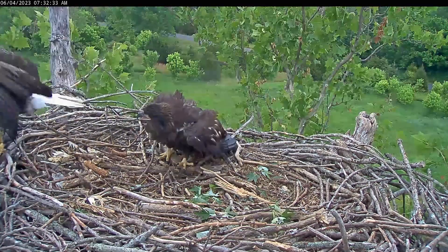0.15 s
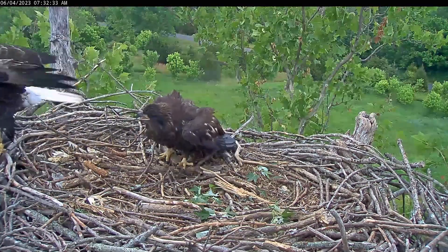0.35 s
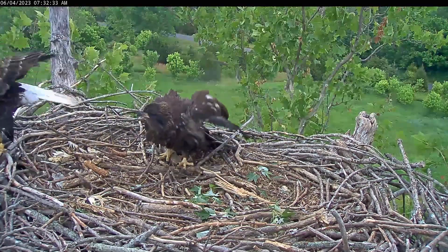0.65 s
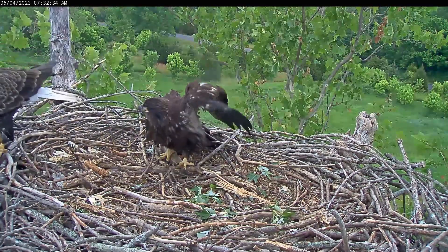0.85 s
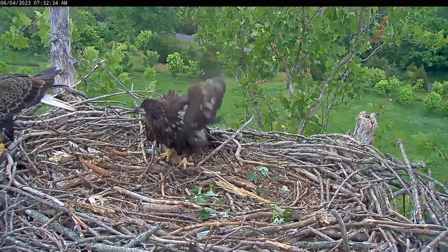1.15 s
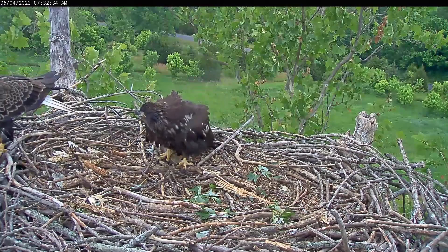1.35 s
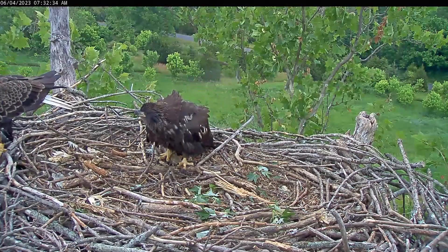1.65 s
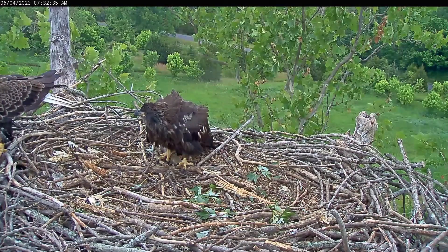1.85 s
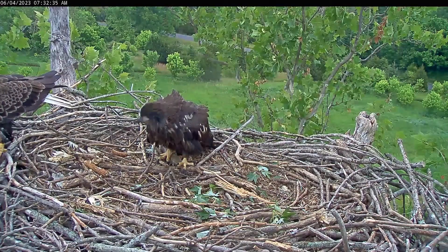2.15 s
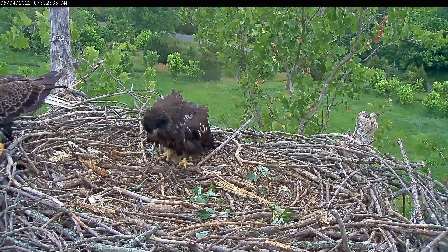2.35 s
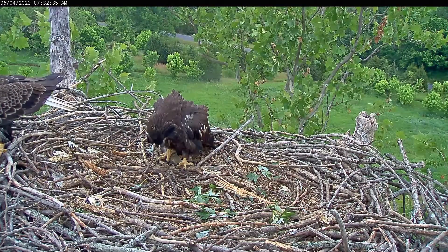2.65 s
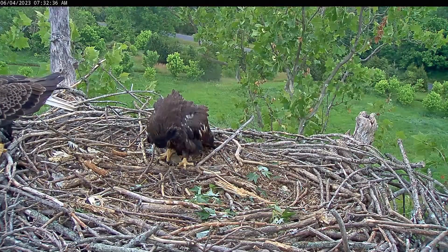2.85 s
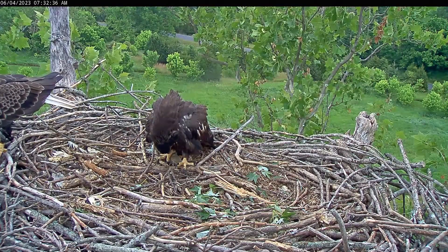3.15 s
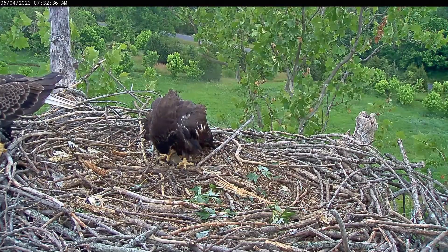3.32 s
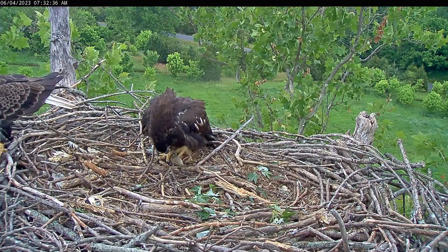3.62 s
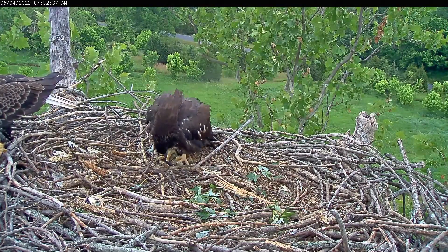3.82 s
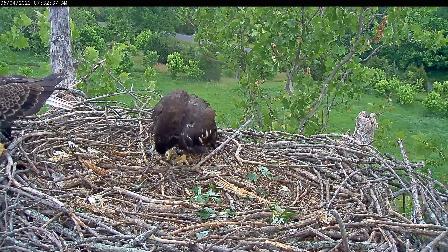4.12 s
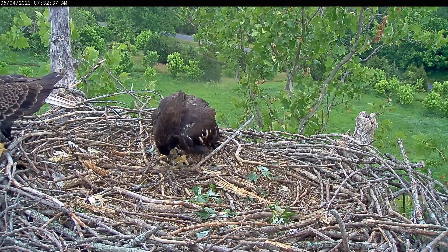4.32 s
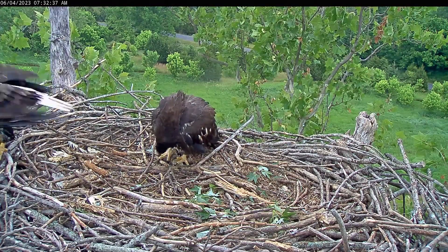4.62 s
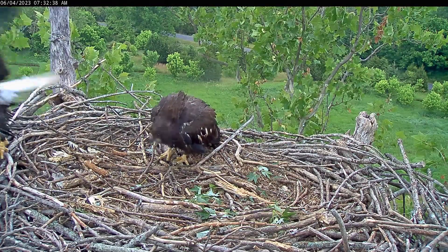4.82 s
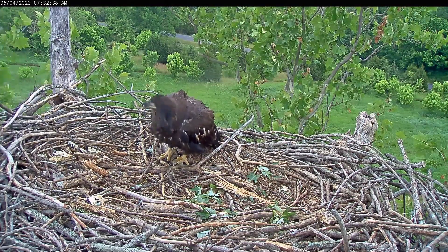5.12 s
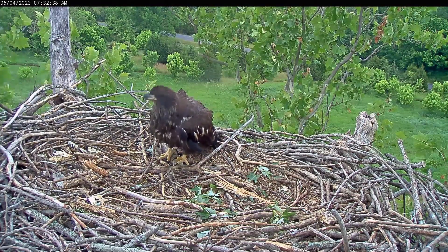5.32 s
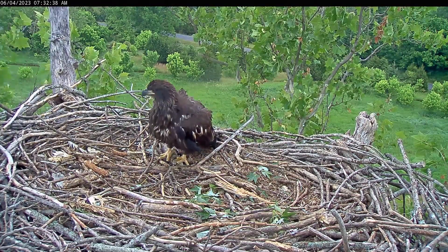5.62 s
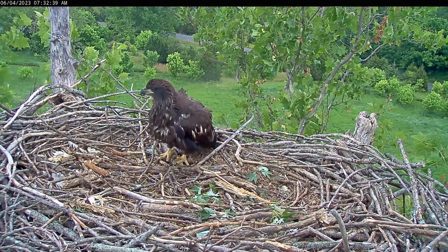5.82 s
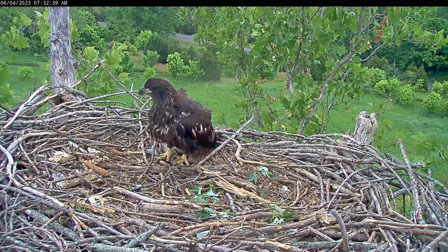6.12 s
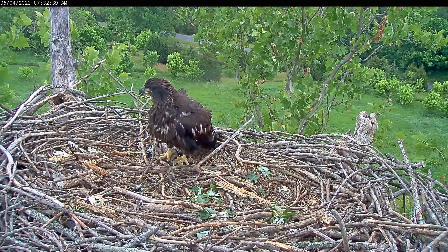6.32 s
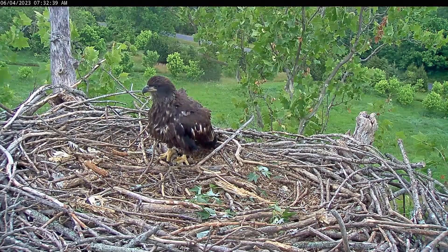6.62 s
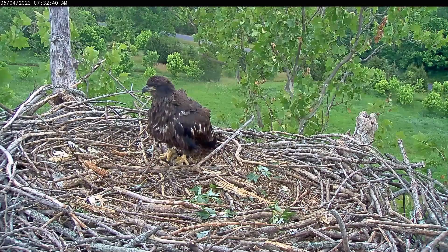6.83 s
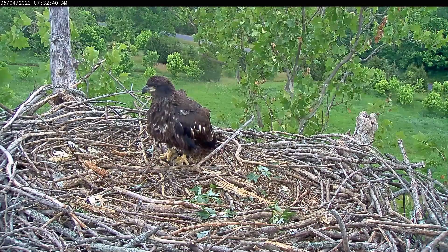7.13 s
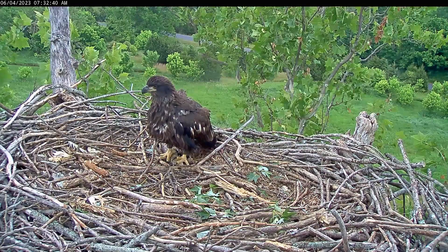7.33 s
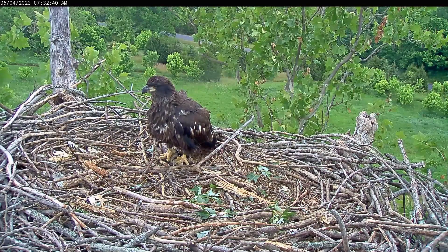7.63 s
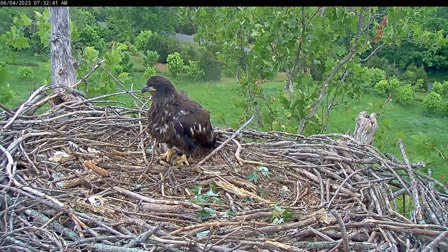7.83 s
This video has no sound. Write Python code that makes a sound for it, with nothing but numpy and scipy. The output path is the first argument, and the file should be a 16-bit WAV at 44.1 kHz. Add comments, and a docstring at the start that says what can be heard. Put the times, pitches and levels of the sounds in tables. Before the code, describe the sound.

A shrill eagle scream opens the sound, with a soft wing flap and a sharp twig snap at 0.2 seconds as an adult lands on the nest. The young eagle screams again at about 1, 2.2, 3.5, 4.6, 6 and 7.2 seconds, each call lasting from over half a second to one second. The screams are high, whistling and wavering, sometimes splitting into two tones or a rasp, and end in a quick downward slide. The second to fifth climb in pitch; the first, fourth and fifth are loudest, the last two lower and weaker. From about 5.1 to 6 seconds the adult flies off with soft feathery whooshes and two low thumps of air. Quiet wind rumble and leaf hiss run throughout, with barely audible distant songbird chirps near 3.3 and 6.9 seconds. Everything is mono, with a slight outdoor echo and the highest treble cut off.

```python
"""A shrill eagle scream opens, with a wing flap and a twig snap as an adult settles on the nest.
The young bald eagle screams seven times in all; during the fifth the adult flies off with low thumps.
Each scream comes from the two sides of the syrinx, which beat together and at times break into a rasp.
Low wind, faint hiss and a distant songbird lie underneath, all heard through a narrow-band mono mic."""
import sys
import numpy as np
from scipy import signal
from scipy.fft import rfft, irfft, next_fast_len
from scipy.io import wavfile
from scipy.ndimage import uniform_filter1d, minimum_filter1d, map_coordinates

SR = 44100
rng = np.random.default_rng(int(sys.argv[2]) if len(sys.argv) > 2 else 0)


def transcribe(signal):
    """Save signal, clipped to [-1, 1], as a 16-bit WAV file at the path in sys.argv[1]."""
    frames = np.atleast_2d(signal).T
    limited = np.clip(frames, -1, 1)
    pcm = np.round(limited * 32767).astype(np.int16)
    wavfile.write(sys.argv[1], SR, pcm)


N = 351477
TIME = np.arange(N) / SR


def amp(db):
    """Decibels to gain."""
    return 10 ** (np.asarray(db) / 20)


def unit(x):
    """Scale to rms 1."""
    return x / np.sqrt(np.mean(x ** 2))


def bell(x, middle, half_width):
    """A bell curve with a peak of 1."""
    return np.exp(-np.minimum(((x - middle) / half_width) ** 2, 20))


def swell(middle_s, half_s):
    """A bell-shaped fade in and out."""
    return bell(TIME, middle_s, half_s)


def curves(rows):
    """One automation curve for each column after the time."""
    times, *columns = np.transpose(rows)
    return [np.interp(TIME, times, column) for column in columns]


def held(spans, rows):
    """Each row's values hold through its span, then glide to the next."""
    return curves([(t, *row) for span, row in zip(spans, rows) for t in span])


def wobble(rate):
    """A smooth random modulator, rate knots a second."""
    return map_coordinates(rng.standard_normal(int(N * rate / SR) + 4), [TIME * rate])


def phasor(hz):
    """A complex oscillator that follows a pitch curve."""
    return np.exp(2j * np.pi * np.cumsum(hz) / SR)


def filtered(x, response):
    """EQ x with a gain that is a function of frequency."""
    size = next_fast_len(N + SR // 2)
    return irfft(rfft(x, size) * response(np.fft.rfftfreq(size, 1 / SR)), size)[:N]


def noise(spectrum):
    """Noise of rms 1, coloured by rows of f/Hz, level/dB."""
    f, db = np.transpose(spectrum)
    colour = lambda hz: amp(np.interp(np.log(hz + 1), np.log(f), db))
    return unit(filtered(rng.standard_normal(N), colour))


def noise_band(centre_hz, half_width_hz):
    """A bell-shaped band of noise of rms 1."""
    return unit(filtered(rng.standard_normal(N), lambda hz: bell(hz, centre_hz, half_width_hz)))


# colour of the wind and leaf bed: f/Hz, relative level/dB
WIND_COLOUR = [(25, -1.5), (75, 0.5), (120, -9), (220, -30), (650, -28.5), (1000, -43), (1600, -44),
               (2700, -24), (6800, -32)]
def wind():
    """Wind rumble and leaf hiss, with a faint whine that comes and goes."""
    whine = amp(-78 + 4 * np.tanh(wobble(1))) * np.sin(2 * np.pi * 810 * TIME)
    return amp(-46 + 1.3 * wobble(3.1)) * noise(WIND_COLOUR) + whine


def songbird(chirps_per_s=12, pitch_hz=3640, rise_hz=400):
    """A small bird far off sings two runs of quick rising chirps."""
    cycle = (TIME * chirps_per_s + .25 * wobble(7)) % 1
    tone = phasor(pitch_hz + rise_hz * (cycle - .5)).imag
    gate = np.maximum(-np.cos(2 * np.pi * cycle), 0)
    runs = swell(3.35, .17) + swell(6.9, .17)
    return amp(-57.5) * runs * gate * tone


def sticks():
    """A twig snaps under the landing adult; later the nest rustles faintly."""
    snap = amp(-19) * swell(.195, .002) * noise(BRIGHT_COLOUR)
    scrape = noise_band(1900, 880)
    return snap + amp(-54.5 + 1.6 * wobble(70)) * swell(3.928, .16) * scrape


# the adult's wing strokes: t/s, half length/s, level/dB
WING_STROKES = [(0.14, 0.12, -37.5), (5.115, 0.028, -47.5), (5.26, 0.15, -43), (5.53, 0.09, -43),
                (5.856, 0.29, -47.5)]
# low pushes of air at take-off: t/s, f/Hz, peak level/dB
WING_THUMPS = [(5.266, 124.3, -35.5), (5.629, 124, -40.5)]
# colour of the feather whoosh: f/Hz, relative level/dB
FEATHER_COLOUR = [(110, -17), (550, -16), (1500, -37), (3000, -12.5), (5000, -22.5)]
def wings():
    """Each stroke gives a fluttering whoosh; the take-off also sends low thumps of air."""
    strokes = sum(amp(db) * swell(t, half_s) for t, half_s, db in WING_STROKES)
    thumps = sum(amp(db) * swell(t, .024) * np.sin(2 * np.pi * hz * (TIME - t))
                 for t, hz, db in WING_THUMPS)
    whoosh = unit(amp(2 * wobble(35)) * noise(FEATHER_COLOUR))
    return strokes * whoosh + thumps


def woodland_echo(x, t60_s, wet_db):
    """The nest and the trees scatter a thin reverb tail."""
    tail = rng.standard_normal(SR) * amp(-60 * TIME[:SR] / t60_s)
    return amp(wet_db) * signal.fftconvolve(x, tail / np.linalg.norm(tail))[:N]


# puff cues, just ahead of four of the screams: t/s
PUFF_CUES = [.963, 2.167, 3.461, 4.572]
def throat_puffs():
    """A short hollow puff as the throat opens."""
    return amp(-52.5) * noise_band(580, 67) * sum(swell(t, .0065) for t in PUFF_CUES)


def turbulence(hz):
    """A band of noise of rms 1, about a kilohertz wide, that tracks a pitch."""
    return unit(((wobble(1100) + 1j * wobble(1100)) * phasor(hz)).imag)


def notched(x, hz, half_width_hz):
    """x with a notch that tracks a pitch."""
    carrier = phasor(hz)
    band = lambda wave: wave * filtered(x * wave, lambda f: bell(f, 0, half_width_hz))
    return x - 2 * (band(carrier.real) + band(carrier.imag))


def air_flow_db(pitch_hz, db_per_hz=.0425, unity_hz=3843, lag_s=.074):
    """A higher pitch takes more air; the flow builds up with a lag but drops at once."""
    target_db = db_per_hz * (pitch_hz - unity_hz)
    pole = np.exp(-1 / (lag_s * SR))
    return np.minimum(target_db, signal.lfilter([1 - pole], [1, -pole], target_db))


# bright colour of the breath, also used for the twig snap: f/Hz, relative level/dB
BRIGHT_COLOUR = [(1500, -53.5), (2050, -5.5), (3000, 3), (4500, 5.5), (5400, 4), (6500, 15), (7000, 6),
                 (7500, -42.5)]
def breath(pitch_hz, hiss_db, beating, spans):
    """Rushing air, chopped into a buzz by the beat between the two sides of the syrinx."""
    flutter = amp(-5.5 + 2.2 * wobble(130) + 1.8 * wobble(30))
    rush = amp(hiss_db + air_flow_db(pitch_hz)) * flutter * beating
    skirt = amp(-2.5) * turbulence(pitch_hz + 605)  # membrane turbulence rides above the note
    hiss = notched(rush * (skirt + noise(BRIGHT_COLOUR)), pitch_hz - 456, half_width_hz=850)
    # the first scream is already under way; the others start with a burst of air
    bursts = sum(swell(start + .006, .012) for start, _ in spans[1:])
    return hiss + amp(-39) * bursts * noise(BRIGHT_COLOUR)


def overtones(a, b, pitch_hz, beat_hz, beak_hz):
    """The closing airway adds the octaves and sum tone of sides a and b; they ring in the beak."""
    tones = 0
    for k, partial in enumerate((a * a, a * b, b * b)):
        beak_db = 10.5 * (bell(2 * pitch_hz + k * beat_hz, beak_hz, half_width=554) - 1)
        flicker_db = 8 * np.tanh(wobble(22))
        tones += partial.imag * amp(beak_db + flicker_db)
    return tones


def sidebands(a, b):
    """The beat between sides a and b throws a ladder of blurred, flickering sidebands."""
    beat = np.exp(1j * (np.angle(b / a) + .5 * wobble(400)))
    ladder = amp(-8.5) * beat + amp(-14.5) * beat ** 2 + amp(-7.5) / beat ** 2
    return (abs(a) * b * ladder).imag * amp(8 * np.tanh(wobble(20)) - 1.5)


def throat(x, cutoff_hz=2462, db_per_hz=1.6):
    """The throat passes little below its cutoff."""
    return filtered(x, lambda hz: amp(-np.clip(db_per_hz * (cutoff_hz - hz), 0, 40)))


def envelopes(spans, release_s=.011, bloom_s=.01, fade_s=.019):
    """Air starts at once and dies quickly; overtones bloom after the attack and fade at the end."""
    blowing = sum((TIME >= start) * np.exp(-np.clip((TIME - end) / release_s, 0, 20))
                  for start, end in spans)
    bloom = 1 - sum((TIME >= start) * np.exp(-abs(TIME - start) / bloom_s) for start, _ in spans)
    fade = 1 - sum(swell(end, fade_s) for _, end in spans)
    return uniform_filter1d(blowing, size=250), bloom * fade


def cracks(calls, spans, leap_hz=415):
    """Brief rasp where the voice cracks: as it starts, stops and leaps up in pitch."""
    leaps = [t for call in calls for (t, before, _), (_, after, _) in zip(call, call[1:])
             if after - before > leap_hz]
    return .45 * (sum(swell(t, .018) for t in np.ravel(spans)) + sum(swell(t, .009) for t in leaps))


# trill cues: t/s
TRILL_CUES = [0.999, 1.111, 4.61, 6.067, 6.279, 6.474]
def trill_hz(rate_hz=55, depth_hz=75.4):
    """The pitch swing as the voice shakes in short, quick trills."""
    envelope = sum(swell(t, .018) for t in TRILL_CUES)
    return depth_hz * envelope * np.sin(2 * np.pi * rate_hz * TIME + wobble(20))


# spells of two-note voice: start/s, end/s, offset from the leading side/Hz, level/dB, rasp/0-1
SECOND_SIDE_SPELLS = [(-.02, 0.068, -640, -32, 0), (0.084, 0.269, 630, -31.5, 0.066),
                      (0.274, 0.348, 1149.5, -31.5, 0.049), (0.362, 0.576, 780, -32.5, 0.02),
                      (1.007, 1.385, 1000, -45, 0.015), (1.39, 1.589, 751, -32.5, 0.25),
                      (1.602, 1.753, 849.5, -27.5, 0.11), (2.465, 2.546, 680, -40.5, 0.013),
                      (2.581, 2.719, 630, -33.5, .09), (2.738, 2.81, 699, -31.5, 0.19),
                      (2.85, 2.89, 350, -22, 0.1), (3.572, 3.78, 392.5, -38.5, 0.056),
                      (3.89, 4.1, 679.5, -56, .04), (4.706, 4.778, 399.5, -44.5, 0.45),
                      (5.045, 5.118, 651, -36.5, 0.067), (5.132, 5.234, 449.5, -39.5, 0.49),
                      (5.241, 5.509, 449, -26, 0.3), (5.526, 5.601, 1791, -37, 0.096),
                      (6.199, 6.303, 760, -47, 0.0032), (6.36, 6.494, 821.5, -44.5, 0),
                      (6.558, 6.626, 821, -45, 0.017), (7.239, 7.835, 628.5, -51, 0.024)]
def second_side(glide_s=.04, jump_hz=830, edge_s=.0087, idle_db=-61):
    """Presence 0-1, beat rate, level and rasp of the second side, which idles between spells."""
    spans = [row[:2] for row in SECOND_SIDE_SPELLS]
    beat_hz, db, rasp = held(spans, [row[2:] for row in SECOND_SIDE_SPELLS])
    # it slides over small pitch steps and jumps wide ones
    window = int(glide_s * SR)
    step_hz = -minimum_filter1d(-beat_hz, size=window) - minimum_filter1d(beat_hz, size=window)
    beat_hz = np.where(step_hz > jump_hz, beat_hz, uniform_filter1d(beat_hz, size=window))
    joined = sum(np.tanh((TIME - start) / edge_s) - np.tanh((TIME - end) / edge_s)
                 for start, end in spans) / 2
    return joined, beat_hz, 20 * np.log10(joined * amp(db) + amp(idle_db)), joined * rasp


def membrane(pitch_hz, db, rasp, waver_hz, jitter_hz, shimmer_db):
    """One side of the syrinx as a phasor; in a rasp its strength and phase tumble."""
    hz = pitch_hz + waver_hz * wobble(60) + jitter_hz * wobble(900)
    chaos = np.sqrt(rasp / 2) * (wobble(400) + 1j * wobble(400))
    strength = amp(db + shimmer_db * np.tanh(wobble(80)))
    return strength * (np.sqrt(1 - rasp) + chaos) * phasor(hz)


# leading side of the syrinx, one contour per scream up to its closing fall: t/s, f/Hz, base level/dB
SCREAM_CONTOURS = [
    [(0.0, 3791, -32), (0.06, 3690, -34), (0.1, 3910, -27.5), (0.165, 4004, -13), (0.194, 4066, -16.5),
     (0.21, 3827, -24), (0.315, 4088, -20.5), (0.45, 3850, -20.5), (0.48, 3845, -14.5), (0.53, 3904, -18.5),
     (0.595, 3763, -19)],
    [(0.975, 2704, -32.5), (1.0, 3053, -30), (1.08, 2896, -32.5), (1.2, 2969, -32), (1.23, 3170, -42.5),
     (1.27, 3080, -36), (1.305, 3351, -40), (1.333, 2987, -34.5), (1.38, 3410, -40), (1.424, 3720, -28.5),
     (1.493, 3450, -32.5), (1.6, 3550, -30.5), (1.738, 3384, -32)],
    [(2.19, 2679, -33.5), (2.223, 2658, -42), (2.235, 2640, -27.5), (2.275, 2649, -45),
     (2.412, 2945, -31.5), (2.46, 3123, -36), (2.55, 3154, -43), (2.6, 3330, -37), (2.74, 3527, -30.5),
     (2.843, 3520, -29.5), (2.872, 3974, -23), (2.897, 3502, -27), (3.1, 3501, -26.5)],
    [(3.474, 2986, -45), (3.505, 3256, -32.5), (3.545, 3093, -44), (3.695, 3270, -40.5),
     (3.735, 3424, -29.5), (3.768, 3395, -26), (3.79, 4074, -19), (3.83, 4015, -14), (3.955, 4177, -22),
     (4.052, 4007, -18), (4.1, 4141, -18.5), (4.145, 3940, -15), (4.181, 4092, -14.5), (4.208, 4004, -15.5)],
    [(4.588, 3312, -43.5), (4.62, 3200, -35.5), (4.67, 3105, -38), (4.73, 3328, -40.5),
     (4.886, 3324, -33.5), (4.889, 3958, -25.5), (4.975, 3900, -24), (5.03, 4093, -10.5), (5.1, 4065, -16),
     (5.124, 3753, -24), (5.245, 3784, -28), (5.281, 4098, -17.5), (5.325, 3708, -32.5),
     (5.37, 4003, -22.5), (5.525, 3760, -34), (5.55, 3496, -30), (5.597, 3475, -33.5)],
    [(6.036, 2982, -45.5), (6.06, 3008, -29), (6.114, 2876, -31), (6.183, 2857, -34.5), (6.215, 2957, -42),
     (6.29, 3056, -29), (6.325, 2944, -32), (6.478, 3175, -35.5), (6.527, 2940, -28.5), (6.608, 3173, -36)],
    [(7.229, 2415, -75), (7.276, 2772, -39.5), (7.3, 2694, -32), (7.33, 2517, -67), (7.385, 2892, -65),
     (7.455, 2736, -37), (7.515, 2710, -44.5), (7.593, 2980, -45), (7.635, 2793, -43.5),
     (7.71, 2732, -36.5), (7.75, 2943, -45), (7.815, 2937, -40), (7.875, 2822, -29)],
]
# voicing of each scream: closing fall/Hz, fall length/s, base level after the fall/dB,
# base overtone gain/dB, base hiss level/dB, beak resonance/Hz
SCREAM_VOICING = [(638, 0.021, -40.5, -28, -35, 6140), (934, .052, -33.5, -32, -29.5, 6750),
                  (280, 0.037, -39, -30.5, -28, 6680), (647, .032, -41, -34.5, -40, 6450),
                  (1047, .028, -31.5, -28.5, -36, 6430), (600, .058, -34, -31, -33, 6530),
                  (368, 0.051, -46.5, -33, -34, 6740)]
def screams():
    """The two membranes of the syrinx share one air stream, so each modulates the other."""
    # every scream ends in a falling slide as the pressure gives out
    calls = [[*call, (call[-1][0] + fall_s, call[-1][1] - fall_hz, end_db)]
             for call, (fall_hz, fall_s, end_db, *_) in zip(SCREAM_CONTOURS, SCREAM_VOICING)]
    spans = [(call[0][0], call[-1][0]) for call in calls]
    pitch_hz, db = curves(np.vstack(calls))
    pitch_hz = pitch_hz + trill_hz()
    overtone_db, hiss_db, beak_hz = held(spans, [row[3:] for row in SCREAM_VOICING])
    joined, beat_hz, second_db, spell_rasp = second_side()
    blowing, bloom = envelopes(spans)

    surges = amp(7 * wobble(35))
    rasp = np.clip(spell_rasp * surges + cracks(calls, spans), 0, 1)
    strain = np.tanh(amp(db + 20)) + joined  # a forced voice quavers more
    lead = membrane(pitch_hz, db - .8, rasp,
                    waver_hz=10 * (1 + strain), jitter_hz=12, shimmer_db=1.93 + 1.1 * strain)
    second = membrane(pitch_hz + beat_hz, second_db, rasp, waver_hz=17, jitter_hz=35.9, shimmer_db=3.5)
    strength = np.hypot(abs(lead), abs(second))
    a, b = lead / strength, second / strength  # each side's share of the voice

    partials = overtones(a, b, pitch_hz, beat_hz, beak_hz) + sidebands(a, b)
    brightness = bloom * amp(overtone_db - 21 * spell_rasp)
    # a rasp dulls the partials and fills the gap between the two sides with noise
    grit = amp(-5.5) * np.sqrt(rasp) * strength * turbulence(pitch_hz + joined * beat_hz / 2)
    voice = throat(np.sqrt(2) * ((lead + second).imag + brightness * partials) + grit)
    leak_db = 2 * joined  # with both sides open, more air escapes
    return blowing * (voice + breath(pitch_hz, hiss_db + leak_db, abs(a + b), spans))


def scene():
    """Mono mix: the young eagle and its echo up front, over wings, sticks, songbird and wind."""
    eaglet = screams()
    echo = woodland_echo(eaglet, t60_s=.88, wet_db=-29.5)
    mono = eaglet + echo + throat_puffs() + wings() + sticks() + songbird() + wind()
    return np.array([mono, mono])


def record(dry, treble_cut_hz=6885, hiss_top_hz=15700):
    """The nest camera's mic cuts the treble steeply; a trace of electronic hiss reaches above it."""
    narrow = filtered(dry[0], lambda hz: amp(-np.clip((hz - treble_cut_hz) / 4, 0, 100)))
    hiss = amp(-82) * rng.standard_normal(N)
    mono = filtered(narrow + hiss, lambda hz: hz < hiss_top_hz)
    return np.array([mono, mono])


dry = scene()
out = record(dry)
transcribe(out)
```